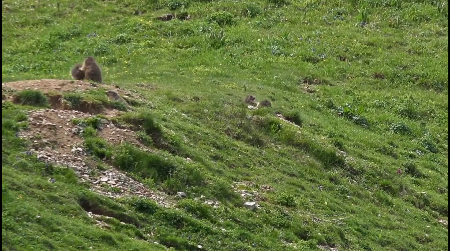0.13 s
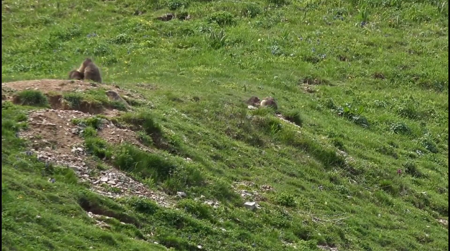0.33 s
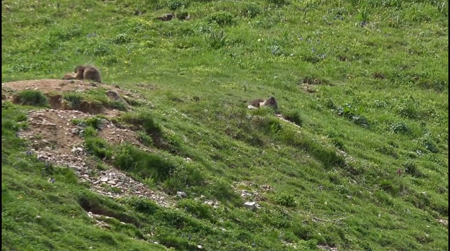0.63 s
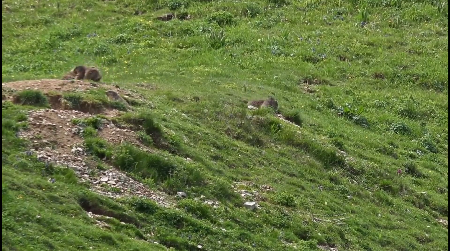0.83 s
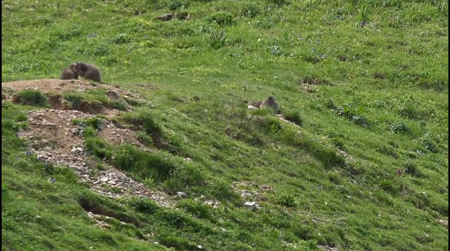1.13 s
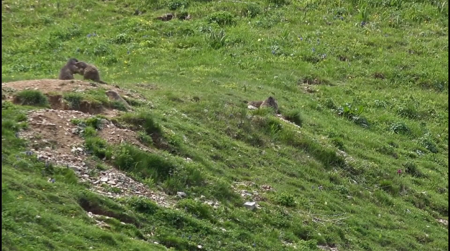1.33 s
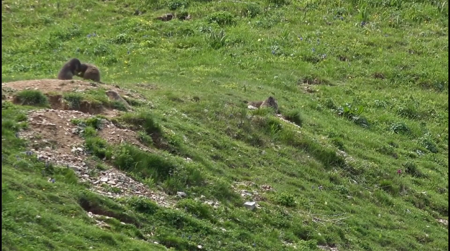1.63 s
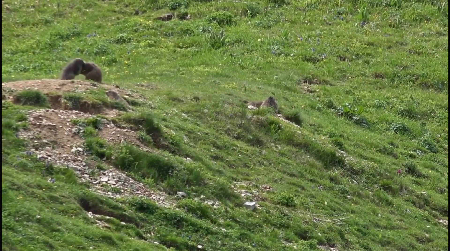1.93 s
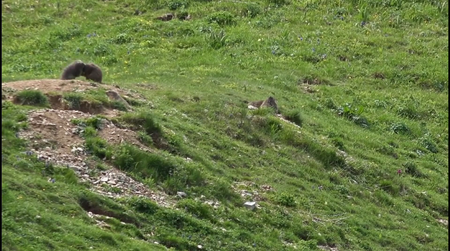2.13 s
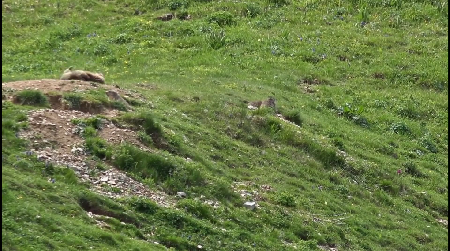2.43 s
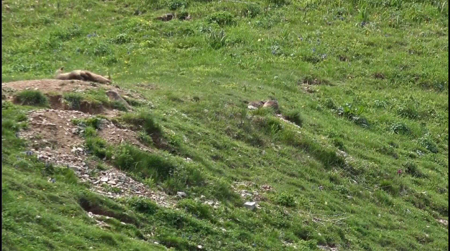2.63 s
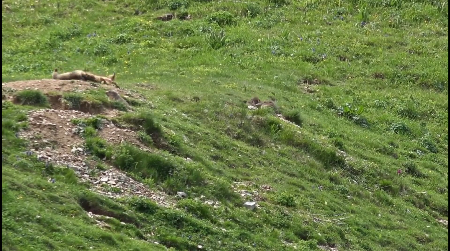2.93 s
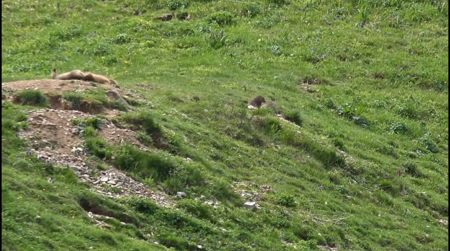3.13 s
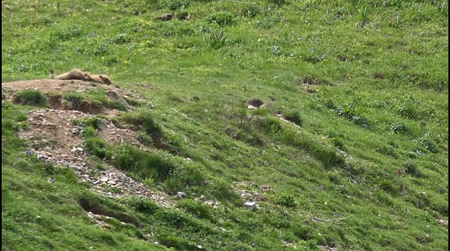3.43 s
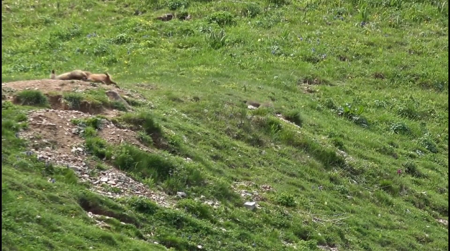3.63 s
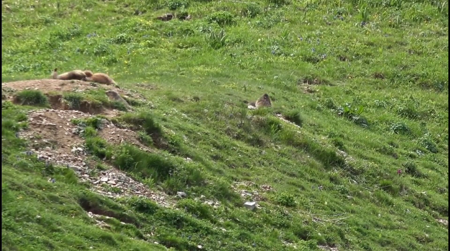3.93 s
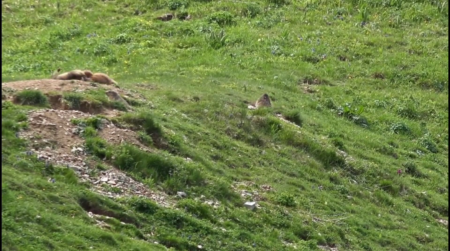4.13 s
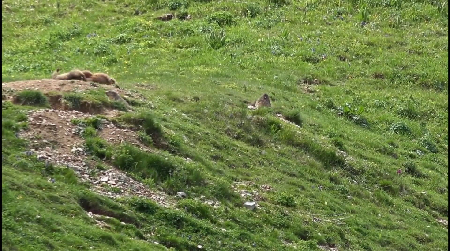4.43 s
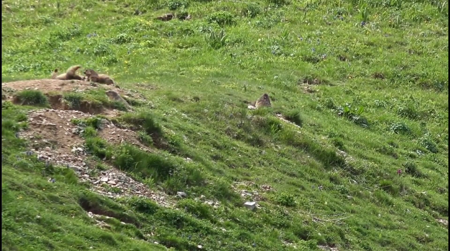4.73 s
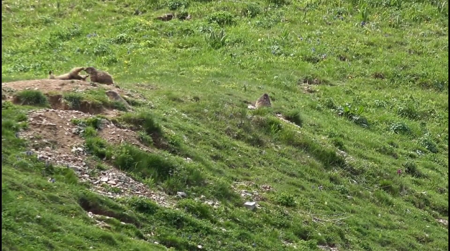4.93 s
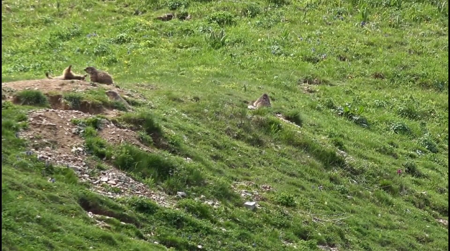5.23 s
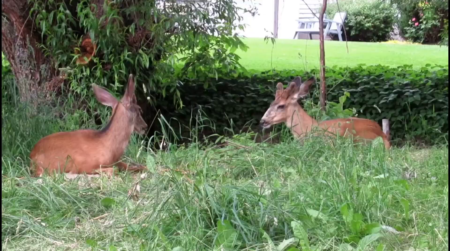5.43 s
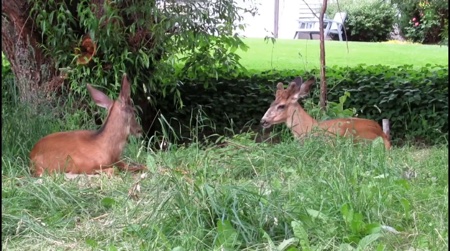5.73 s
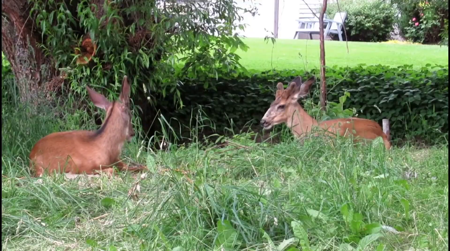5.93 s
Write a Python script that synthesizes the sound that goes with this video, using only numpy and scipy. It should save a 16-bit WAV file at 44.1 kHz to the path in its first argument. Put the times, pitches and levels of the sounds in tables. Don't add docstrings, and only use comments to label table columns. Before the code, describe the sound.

On a breezy grassy hillside a marmot barks shrilly, cries with a cracking voice and yelps repeatedly; abruptly, a deer groans nearby.

```python
import sys
import numpy as np
from scipy import signal
from scipy.fft import rfft, irfft, next_fast_len
from scipy.io import wavfile
from scipy.ndimage import uniform_filter1d, map_coordinates

SR = 44100
rng = np.random.default_rng(int(sys.argv[2]) if len(sys.argv) > 2 else 0)


def level_to_linear(level):
    exponent = np.asarray(level, float) / 20
    return 10 ** exponent


def to_wav(s):
    ch = np.atleast_2d(s).T
    pcm = np.round(np.clip(ch, -1, 1) * 32767)
    wavfile.write(sys.argv[1], SR, pcm.astype(np.int16))


N = 268613
CUT_S = 5.5

# (time of the top [s], rise [s], fall [s], top pitch [Hz], level [dB])
BARKS = [
    (-.025, 0.034, 0.047, 1387, -20),
    (0.157, 0.024, 0.049, 1405, -18.5),
    (0.346, 0.034, 0.05, 1537, -18),
    (0.54, 0.031, 0.036, 1306, -21.5),
]
SQUEAL = [
    (2.748, .034, .044, 2245, -25),
]
YELPS = [
    (2.949, .036, 0.041, 1550, -23.5),
    (3.131, 0.03, 0.05, 1275, -28),
    (3.312, 0.042, 0.041, 1295, -22),
    (3.503, 0.033, 0.046, 1182, -24.5),
    (3.692, 0.041, .044, 1119, -26),
    (3.895, 0.024, 0.045, 1001, -36.5),
    (4.119, 0.029, 0.039, 991, -34.5),
    (4.343, 0.043, 0.049, 1056, -27.5),
]
# start and end pitch [Hz], curve exponents, levels [dB] per part of the voice
BARK_VOICE = dict(start_hz=1084, end_hz=747.6, bend=1.7, swell=2.07, swell_db=19.5, veil_db=-1.5, half_db=-24, rasp_db=-22.5, lifts_db=(0, 6.5, 0.5),
              strain_db=(-4.3, 2.6, 0))
SQUEAL_VOICE = dict(start_hz=863, end_hz=606, bend=1.1, swell=1.6, swell_db=14, veil_db=3.5, half_db=-76, rasp_db=-20, lifts_db=(0.3, 7.5, 0.8),
                strain_db=(-0.8, -1, 0.6))
YELP_VOICE = dict(start_hz=931, end_hz=723, bend=1.95, swell=2.06, swell_db=20, veil_db=4, half_db=-54, rasp_db=-28, lifts_db=(-12.5, -8.5, 3.5),
              strain_db=(11, 12, -5))
# (time [s], pitch [Hz], level [dB])
CRY_HIGH = [(2.063, 1960, -46), (2.076, 1878, -34), (2.119, 1844, -24.5), (2.181, 1770, -30),
            (2.194, 1694, -31)]
CRY_LOW = [(2.193, 1456, -31), (2.21, 1410, -30), (2.26, 1370, -25.5), (2.301, 1277, -30),
           (2.36, 1227, -28), (2.45, 1242, -28.5), (2.476, 1283, -27), (2.501, 1520, -30.5),
           (2.511, 1695, -27.5)]
CRY_END = [(2.509, 1973, -29.5), (2.526, 2100, -27.5), (2.541, 1903, -26.5), (2.548, 1421, -38),
           (2.559, 1202, -41), (2.572, 918, -45), (2.585, 800, -65)]
# (frequency [Hz], ..)
MOUTH_HZ = (2494, 4250, 7780)
# (first [dB], second [dB], third [dB])
CRY_LIFTS = [
    (27.5, 2, 0.57),
    (-6.5, 7, 1.9),
    (6.5, 11.5, 1.94),
]
# (frequency [Hz], level [dB])
THROAT = [(600, -14), (850, -5.5), (1300, -2.5), (2000, -4.5), (2700, -2), (3600, -10.5), (4100, -11.5),
          (4700, -14), (6200, -17.5), (7600, -15), (8500, -19.5), (9000, -28)]
# (frequency [Hz], left over right [dB])
FACING = [(700, 0.5), (1400, 2), (2800, -3.5), (4500, -4.5), (7500, -8.5)]
# (time [s], share of FACING [1])
TURN = [(0, 0.47), (.6, 0.63), (2, 0.78), (4.5, 1.45)]
# (centre [Hz], width [Hz], depth [0-1])
BURROW_NOTCH = (3040, 236, 0.79)
# (centre [Hz], width [Hz], depth [0-1])
NOTCHES = [(2430, 37, 0.5), (4087, 320, 0.7), (6260, 210, .6), (7200, 310, 0.6)]
# (delay [s], level [dB])
BOUNCES = [(.0034, -17), (.0078, -16), (0.0132, -16)]
# (frequency [Hz], 60 dB decay [s])
ROCKS = [(500, 0.017), (2000, 0.1), (5000, 0.1), (9000, 0.066)]
# (frequency [Hz], 60 dB decay [s])
SLOPE = [(500, 0.23), (1500, 0.39), (3000, 0.35), (6000, 0.13)]

# (time [s], level [dB])
WIND = [(0, -55), (.65, -54), (.9, -61.5), (1.86, -64), (2.35, -57), (3.05, -55.5), (3.35, -51.5),
        (3.9, -53.5), (4.3, -57), (5.45, -59)]
# (frequency [Hz], level [dB per Hz])
RUMBLE = [(12, -62.5), (20, -26), (49, 1.5), (67, 3.5), (81, -7), (118, -5), (200, -27), (260, -16.5),
          (440, -120)]
# (frequency [Hz], level [dB per Hz])
GRASS = [(90, -37.5), (140, -4.5), (260, -13), (750, -16.5), (1500, -22.5), (2700, -30), (4700, -28),
         (8500, -28.5), (10000, -31.5), (12000, -30), (14000, -31), (15500, -35)]
# (frequency [Hz], likeness [0-1])
ALIKE = [(60, 1), (250, 0.77), (2800, 0.94), (4900, 0.48), (8400, .1), (12000, 0.36)]

# (time of the last pulse [s], pulses [count], peak level [dB])
CHIRPS = [(.128, 2, -58), (.418, 2, -58), (0.644, 2, -53), (1.26, 3, -64), (1.537, 3, -57), (1.739, 4, -54),
          (1.967, 4, -60), (2.283, 2, -61), (2.658, 2, -58), (2.888, 3, -58), (3.089, 3, -62),
          (3.586, 3, -57), (3.829, 3, -57.5), (4.296, 3, -54), (4.564, 4, -58), (4.859, 4, -66),
          (5.096, 4, -62), (5.356, 3, -62)]
# (time [s], length [s], level [dB])
RUSTLES = [(.66, .03, -71), (.845, .025, -69), (1.11, .02, -72), (1.2, .05, -69), (1.63, .02, -71),
           (1.95, .08, -72)]
# (time [s], level [dB])
TICKS = [
    (1.5927, -35),
    (3.964, -59),
    (3.998, -62),
    (5.288, -61.5),
]
# (frequency [Hz], level [dB], 60 dB decay [s])
PEBBLE = [(1370, -9, 0.047), (2040, 7, 0.0092), (3170, -12.5, 0.0081), (4300, -6.5, 0.013),
          (8100, -1.5, .008), (11700, -16.5, .006), (13000, -17, 0.0043)]

# (time [s], effort [dB])
GROAN = [
    (5.645, -67),
    (5.67, -49.5),
    (5.79, -41),
    (5.85, -52),
    (5.89, -49),
    (5.95, -36),
    (5.99, -36),
    (6.022, -32.5),
    (6.1, -36),
]
# (time [s], rate [pulses per second])
GROAN_RATE = [(5.645, 50.2), (5.69, 50.6), (5.75, 52.7), (5.825, 51.2), (5.895, 52.6), (5.95, 56.7),
              (6.02, 59), (6.1, 60.8)]
# (overtone [number], level [dB])
CHEST = [(2, -54.5), (5, -63.5)]
# (centre [Hz], width [Hz], level [dB])
MUZZLE = [
    [(384, 37, -1), (614, 71, 4), (1027, 60, 9.5), (1336, 120, 8), (1830, 130, 7.5), (2400, 600, 8),
     (3280, 200, -11.5)],
    [(381, 7.7, 4), (533, 39, 1.5), (920, 26, 4.5), (1316, 54, 8), (1836, 36, 10.5), (2290, 290, 4.5),
     (3200, 170, -4.5)],
]
# (frequency [Hz], left over right [dB])
DEER_SIDE = [(100, 7), (300, -11.5), (900, -9.5), (3000, -3.5)]
# (frequency [Hz], level [dB per Hz])
GARDEN = [(60, -4), (200, -1.5), (1000, -16.5), (3000, -28.5), (4800, -37.5), (5400, -52.5)]


def unit(x):
    return x / np.sqrt(np.mean(x ** 2) + 1e-20)


def along(points, hz):
    f, v = np.transpose(points)
    return np.interp(np.log(hz + 1), np.log(f + 1), v)


def columns(rows, t):
    s, *cols = np.transpose(rows)
    return [np.interp(t, s, c) for c in cols]


def wobble(rate, size):
    knots = rng.standard_normal(int(size * rate / SR) + 4)
    return map_coordinates(knots, [np.arange(size) * rate / SR])


def filtered(x, response):
    m = next_fast_len(N + SR // 2)
    return irfft(rfft(x, m) * response(np.fft.rfftfreq(m, 1 / SR)), m)[..., :N]


def resonances(modes):
    def response(f):
        return sum((-1) ** k * level_to_linear(db) * 1j * f * w / (c * c - f * f + 1j * f * w)
                   for k, (c, w, db) in enumerate(modes))
    return response


def dips(notches):
    return lambda hz: np.prod([1 - np.clip(d, 0, 1) / (1 + (2 * (hz - c) / w) ** 2)
                               for c, w, d in notches], axis=0)


def add(track, s, sound):
    i = round(s * SR)
    part = track[..., max(i, 0):max(i + sound.shape[-1], 0)]
    part += sound[..., max(-i, 0):][..., :part.shape[-1]]


def rush(spectrum, alike, patchy_db):
    z = signal.stft(rng.standard_normal((2, N + 512)), nperseg=512)[2]
    field = uniform_filter1d(rng.standard_normal(z.shape[1:]), 6, 0)
    field = uniform_filter1d(field, 10, 1)
    pair = signal.istft(z * level_to_linear(patchy_db * unit(field)), nperseg=512)[1][:, :N]

    def response(hz):
        gain = level_to_linear(along(spectrum, hz)) * (hz > spectrum[0][0]) * (hz < spectrum[-1][0])
        turn = np.arccos(np.clip(along(alike, hz), -1, 1)) / 2
        return gain * [np.cos(turn), np.sin(turn)]

    mid, side = filtered(pair, response)
    return unit(np.array([mid + side, mid - side]))


def space(x, t60s, gap_s):
    hz, t, z = signal.stft(rng.standard_normal((2, SR // 2)), SR, nperseg=256)
    tail = signal.istft(z * level_to_linear(-60 * t / along(t60s, hz)[:, None]), SR, nperseg=256)[1]
    tail = 2.5 * tail[0] + 0.14 * tail[1] * np.array([[1], [-1]])
    tail = tail / np.linalg.norm(tail[0])
    late = np.pad(x, (round(gap_s * SR), 0))
    return signal.fftconvolve(late[None], tail, axes=1)[:, :N]


def whistle(t, pitch_hz, level_db, half_db, rasp_db, lifts_db, dull_db=0):
    order = np.arange(1, 25)[:, None] / 2
    hz = order * pitch_hz
    db = level_db + along(THROAT, hz) - dull_db * np.log2(1 + order)
    db += sum(lift * np.exp(-((hz - c) / (0.2 * c)) ** 2) for c, lift in zip(MOUTH_HZ, lifts_db))
    db += (half_db + 3 * order + 8 * (order < 1)) * (order % 1 > 0)
    breakup = np.clip([wobble(110, len(t)) for _ in order], -3, 1)
    db += np.minimum((5 + 2 * order) * level_to_linear(rasp_db / 2), 4.5) * breakup
    phase = 2 * np.pi * np.cumsum(pitch_hz * (1 + 0.0049 * wobble(250, len(t)))) / SR
    phase += 0.6 * level_to_linear(rasp_db) * wobble(1300, len(t))
    lines = np.sqrt(2) * level_to_linear(db) * np.cos(order * phase - 0.41 * order ** 2) * (hz < THROAT[-1][0])
    side_db = along(FACING, hz) * columns(TURN, t)[0] / 2
    tone = np.array([(lines * level_to_linear(side_db)).sum(0), (lines * level_to_linear(-side_db)).sum(0)])
    edge = np.clip(np.minimum(t - t[0], t[-1] - t) / 0.0022, 0, 1)
    return edge * tone * (1 + level_to_linear(rasp_db) * wobble(2500, len(t)))


def arch(row, voice, choke_db=0):
    calm_hz, start_pull, end_pull = 993, 0.22, 0.27
    top_s, rise, fall, top_hz, db = row
    climb = top_hz - calm_hz
    start_hz = voice["start_hz"] + start_pull * climb
    end_hz = voice["end_hz"] + end_pull * climb
    t = np.arange(top_s - 1.02 * rise, top_s + 1.4 * fall, 1 / SR)
    up = np.clip((top_s - t) / rise, 0, None)
    down = np.clip((t - top_s) / fall, 0, None)
    pitch = top_hz - (top_hz - start_hz) * up ** (1.12 * voice["bend"])
    pitch -= (top_hz - end_hz) * down ** voice["bend"]
    choke = choke_db * np.exp(-((t - top_s) / 0.011) ** 2)
    effort_db = db - voice["swell_db"] * (rise / 0.041) * up ** voice["swell"]
    effort_db -= 18 * down ** (1.51 * voice["swell"]) + choke
    lifts = np.add(voice["lifts_db"], np.multiply(voice["strain_db"], np.log2(top_hz / calm_hz)))
    dull_db = voice["veil_db"] * up ** 3.0 + 2.8 * down ** 2
    rasp_db = voice["rasp_db"] + 9 * down + 1.1 * choke
    return t[0], whistle(t, pitch, effort_db, voice["half_db"], rasp_db, lifts, dull_db)


def long_cry(out):
    for rows, lifts in zip((CRY_HIGH, CRY_LOW, CRY_END), CRY_LIFTS):
        t = np.arange(rows[0][0], rows[-1][0], 1 / SR)
        pitch, db = [uniform_filter1d(c, size=260, mode="nearest") for c in columns(rows, t)]
        glide = np.abs(np.gradient(pitch)) * SR / 1000
        rasp_db = -35 + 3.5 * np.log2(1 + glide)
        flutter = 0.28 * np.exp(-((t - CRY_HIGH[-2][0]) / 0.03) ** 2) * (rows is CRY_HIGH)
        beat = 2 * np.pi * np.cumsum(195 * (1 + 0.11 * wobble(60, len(t)))) / SR
        shaken_hz = pitch * (1 + 0.31 * flutter * np.cos(beat))
        voice = whistle(t, shaken_hz, db, -80.5, rasp_db + 25 * flutter, lifts)
        add(out, t[0], (1 + flutter * np.sin(beat)) * voice)


def marmot():
    barks, out = np.zeros((2, 2, N))
    for row in BARKS:
        add(barks, *arch(row, BARK_VOICE))
    long_cry(out)
    add(out, *arch(SQUEAL[0], SQUEAL_VOICE, choke_db=10))
    for row in YELPS:
        add(out, *arch(row, YELP_VOICE))
    out += filtered(barks, lambda hz: dips([BURROW_NOTCH])(hz) / (1 + (hz / 7950) ** 16))

    def path(hz):
        stones = sum(level_to_linear(db) * np.exp(-2j * np.pi * hz * s) for s, db in BOUNCES)
        bounced = 1 + stones / (1 + (2200 / (hz + 1)) ** 4)
        return bounced * dips(NOTCHES)(hz) / (1 + (hz / 8700) ** 40) / (1 + (500 / (hz + 1)) ** 4)

    return filtered(out, path)


def wind(calls):
    shake_s, shake_late_s, shake_db = 0.05, 0.013, -26.5
    late_power = np.pad(calls.mean(0) ** 2, (round(shake_late_s * SR), 0))[:N]
    shake = np.abs(uniform_filter1d(late_power, round(shake_s * SR)))
    rumble_db = columns(WIND, np.arange(N) / SR)[0]
    total = np.sqrt(level_to_linear(2 * rumble_db) + level_to_linear(2 * shake_db) * shake)
    drone = level_to_linear(-59.0)
    gusts = np.sqrt(np.clip(total ** 2 - drone ** 2, 0, None))
    gusts = gusts * level_to_linear(1.4 * np.array([wobble(12, N), wobble(5.5, N)]))
    buffet = gusts * level_to_linear([[-3], [3]]) * rush(RUMBLE, [(30, .35), (150, 0.6)], patchy_db=1.0)
    far_drone = drone * rush(RUMBLE, [(30, 0.93), (150, 1.0)], patchy_db=-0.3)
    hiss = level_to_linear(-58.0) * rush(GRASS, ALIKE, patchy_db=1.07)
    return far_drone + buffet + hiss


def cricket():
    out, t = np.zeros(N), np.arange(round(0.018 * SR)) / SR
    for s, count, db in CHIRPS:
        for k in range(round(count)):
            hz = 4800 - 15000 * t + rng.normal(0, 25) + 70 * wobble(300, len(t))
            tone = np.sin(2 * np.pi * np.cumsum(hz) / SR)
            stroke_db = db + 1 - 0.25 * k ** 3 + rng.normal(0, 0.7) + 2.5 * wobble(200, len(t))
            add(out, s - 0.009 - k * 0.031, level_to_linear(stroke_db) * np.hanning(len(t)) ** 0.48 * tone)
    return out * level_to_linear([[-1.2], [1.2]])


def rustle():
    t = np.arange(N) / SR
    stirs = sum(level_to_linear(db) * np.exp(-((t - s) / length) ** 2) for s, length, db in RUSTLES)
    spikes = level_to_linear(4 * wobble(120, N))
    stems = rush([(3800, -3), (4800, 8), (6200, 2), (7500, -16)], [(5000, .6)], patchy_db=4.5)
    return stirs * spikes * stems


def pebbles():
    out, t = np.zeros(N), np.arange(SR // 20) / SR
    for s, db in TICKS:
        ring = sum(level_to_linear(level - 60 * t / t60) * np.sin(2 * np.pi * hz * t) for hz, level, t60 in PEBBLE)
        grit = np.convolve(rng.standard_normal(len(t)), [1, 1, -1, -1], "same")
        ring += 0.7 * level_to_linear(-60 * t / 0.01) * grit
        add(out, s, level_to_linear(db) * ring)
        add(out, s + 0.0015, level_to_linear(db - 10) * ring)
    return out


def deer():
    t = np.arange(N) / SR
    start_s = GROAN[0][0]
    on = t > start_s
    mouth_db, = columns(GROAN, t)
    rate, = columns(GROAN_RATE, t)
    shut_rate, open_rate = 52.7, 56.5
    jaw = np.clip((rate - shut_rate) / (open_rate - shut_rate), 0, 1)
    third_db = -36 - 6.5 * jaw + 1.3 * (mouth_db + 41.5)
    fourth_db = -32 - 8.5 * jaw - 0.45 * (mouth_db + 42.5) - 22 * np.exp(-np.abs(t - start_s) / 0.047)
    steady = np.cumsum(on * rate) / SR + 0.88
    cycle = steady + 0.03 * wobble(50, N)
    pulses = np.abs(np.diff(np.floor(cycle), prepend=0)) * on * level_to_linear(1.1 * wobble(55, N))
    puffs = np.exp(-(cycle % 1) / 0.4) * rng.standard_normal(N) * on

    chest = np.zeros(N)
    for k, db in [(3, third_db), (4, fourth_db)] + CHEST:
        phase = 2 * np.pi * round(k) * steady + 0.43 * wobble(25, N)
        chest += np.sqrt(2) * level_to_linear(db + 0.96 * wobble(30, N)) * np.sin(phase)
    drive = filtered(pulses + 0.055 * puffs, lambda f: 1 / (1 + 1j * f / 3600) ** 9)
    shut, opened = [filtered(drive, resonances(modes)) for modes in MUZZLE]
    mouth = (1 - jaw) * shut + jaw * opened
    voice = on * chest + np.sqrt(on.mean()) * level_to_linear(mouth_db) * unit(mouth)

    def lead(hz):
        return along(DEER_SIDE, hz) / 2 * np.log(10) / 20 + 1j * np.pi * hz * 0.00022

    near = filtered(voice, lambda hz: np.exp([lead(hz), -lead(hz)]))
    echo = level_to_linear(-11) * space(voice - 0.7 * on * chest, [(200, .2), (3000, .2)], gap_s=0.004)
    echo = echo * level_to_linear([[-3], [3]])
    air = level_to_linear(-51.0) * rush(GARDEN, [(100, 1.0), (2000, .1)], patchy_db=-4.0)
    fade = np.clip((t - start_s) / 0.0059, 0, 1)
    fade *= np.sin(np.pi / 2 * np.clip((t[-1] - t) / 0.003, 0, 1)) ** 2
    return fade * (near + echo + air)


def scene():
    calls = marmot()
    near = level_to_linear(-12) * space(calls.mean(0), ROCKS, gap_s=0.0022) * level_to_linear([[-1.5], [1.5]])
    far = level_to_linear(-34.0) * space(calls.mean(0), SLOPE, gap_s=0.046)
    slope = calls + near + far + wind(calls) + cricket() + rustle() + pebbles()
    return slope * (np.arange(N) < CUT_S * SR) + deer()


def band_limit(x):
    return signal.sosfilt(signal.butter(12, 15550, fs=SR, output="sos"), x)


def record(dry):
    upper = filtered(dry, lambda hz: (hz > 8900) * (hz < 11000))
    bright = filtered(dry.mean(0), lambda hz: (hz > 7950) * (hz < 8400))
    loud_db = 10 * np.log10(np.abs(uniform_filter1d(bright ** 2, size=1600)) + 1e-12)
    thinning = np.clip((loud_db + 56 + 3 * wobble(17, N)) / 4, 0, 1)
    mix = dry - thinning * upper
    return band_limit(mix)


dry = scene()
out = record(dry)
to_wav(out)
```